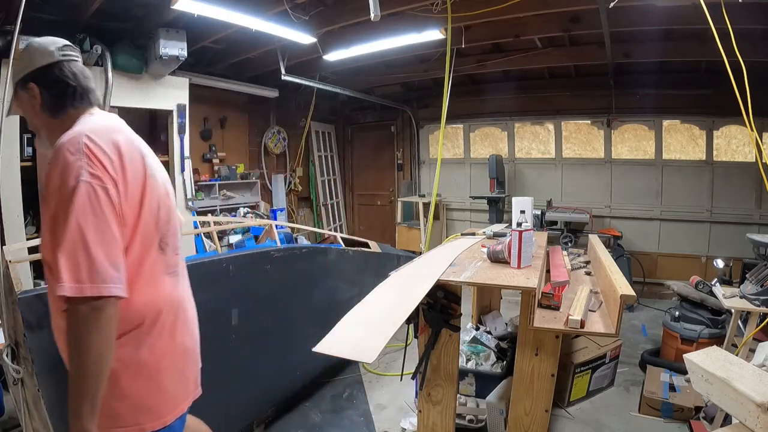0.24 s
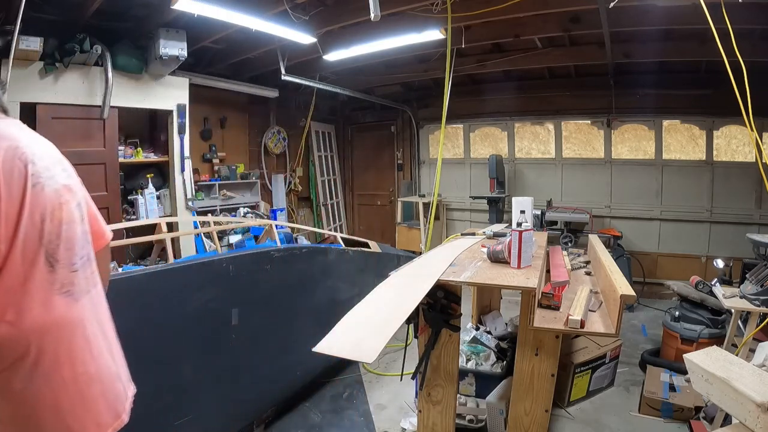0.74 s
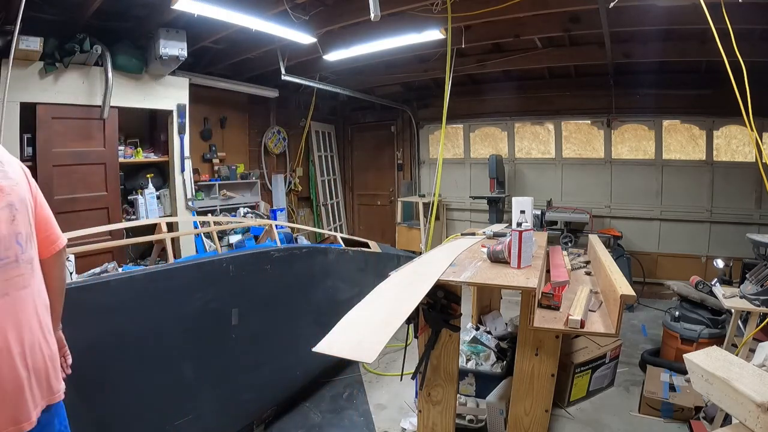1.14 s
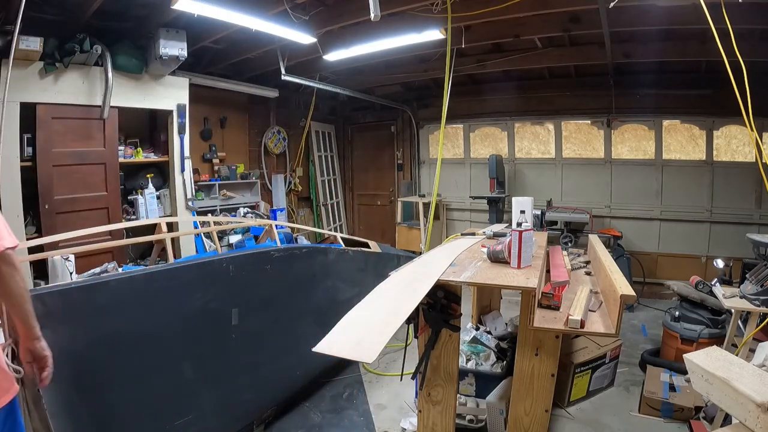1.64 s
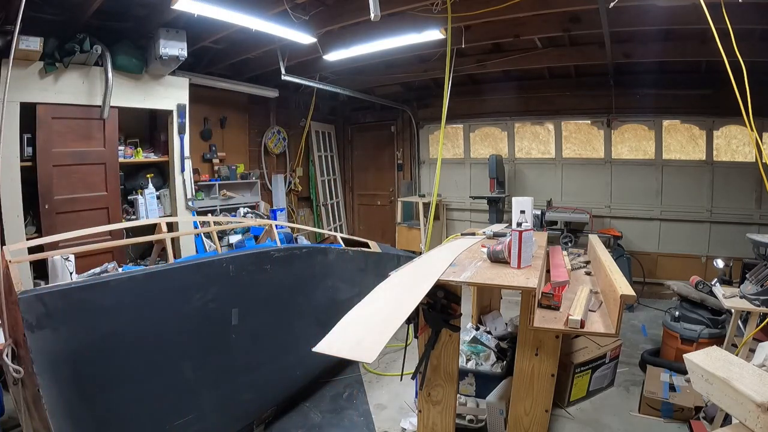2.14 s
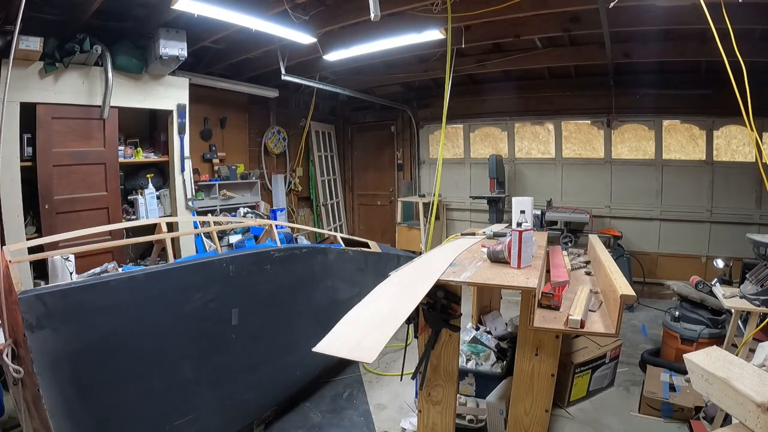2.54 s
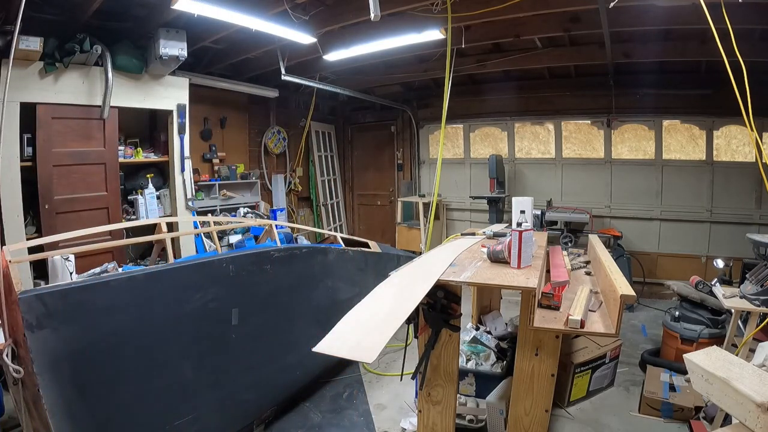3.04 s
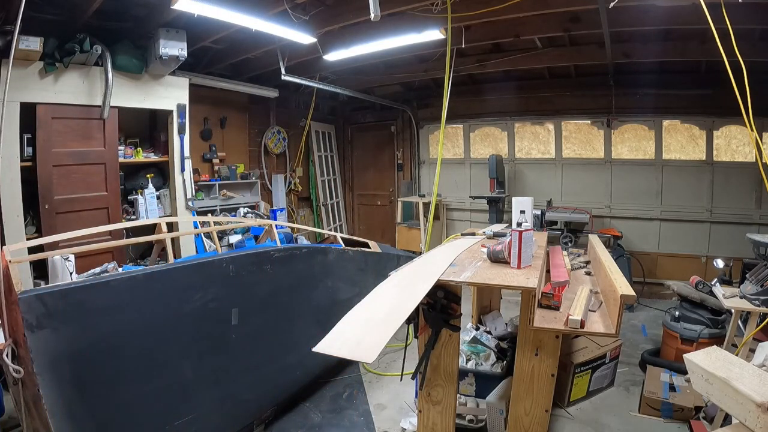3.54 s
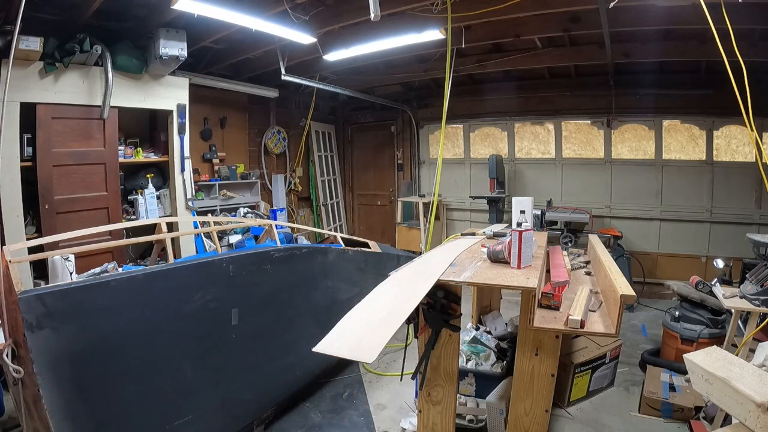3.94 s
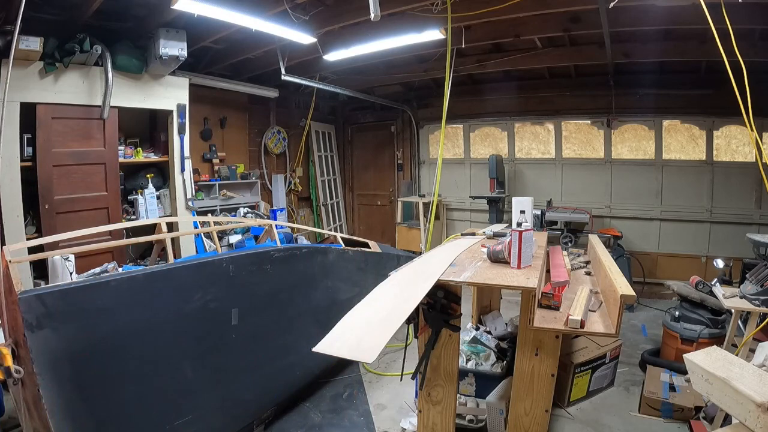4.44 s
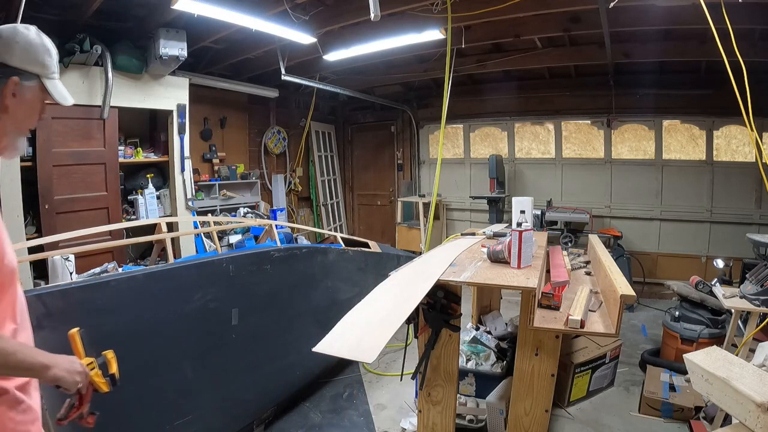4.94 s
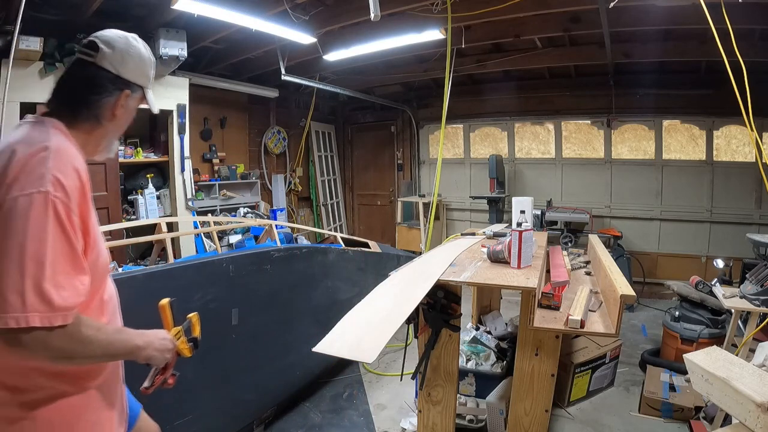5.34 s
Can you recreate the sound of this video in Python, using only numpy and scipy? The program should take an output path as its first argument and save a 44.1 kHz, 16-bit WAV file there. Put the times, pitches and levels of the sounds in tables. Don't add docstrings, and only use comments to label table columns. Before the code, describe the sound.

Soles scuff on a gritty garage floor, small parts tick, then a board scrapes loudly off a shelf over a low uneven hum.

```python
import sys
import numpy as np
from scipy import signal
from scipy.fft import rfft, irfft, next_fast_len
from scipy.io import wavfile
from scipy.ndimage import uniform_filter1d

SR = 44100
rng = np.random.default_rng(int(sys.argv[2]) if len(sys.argv) > 2 else 0)


def store_wav(level_fs):
    pcm = np.round(np.clip(np.atleast_2d(level_fs), -1, 1) * 32767)
    wavfile.write(sys.argv[1], SR, pcm.T.astype(np.int16))


def gain_from_db(level_db):
    decades = np.asarray(level_db, float) / 20
    return 10 ** decades


N = 246556
T = np.arange(N) / SR
TICK_T = np.arange(SR // 8) / SR
PORTS = np.array([[1], [-1]])


def unit(x):
    return x / np.sqrt(np.mean(x ** 2))


def over_log_hz(hz, table):
    points_hz, values = np.array(table)[:, :2].T
    return np.interp(np.log(hz), np.log(points_hz), values)


def over_hz(table, size):
    return over_log_hz(np.maximum(np.arange(size // 2 + 1) * SR / size, 1), table)


def colour(x, table):
    size = next_fast_len(x.shape[-1], real=True)
    return irfft(rfft(x, size) * gain_from_db(over_hz(table, size)), size)[..., :x.shape[-1]]


def band(x, lo_hz, hi_hz):
    edges_hz = [lo_hz, min(hi_hz, .45 * SR)]
    return signal.sosfilt(signal.butter(3, edges_hz, "band", fs=SR, output="sos"), x)


def resonate(x, modes):
    out = 0
    for k, (hz, width_hz, db) in enumerate(modes):
        out = out + (-1) ** k * gain_from_db(db) * signal.lfilter(*signal.iirpeak(hz, hz / width_hz, SR), x)
    return out


def narrow(x, hz, width_hz):
    mode = [(hz, width_hz, 0)]
    return resonate(resonate(x, mode), mode)


def ring(hz, db, t60_s):
    decay = gain_from_db(db - 60 * TICK_T / max(t60_s, .003))
    return decay * np.sin(2 * np.pi * hz * TICK_T) * np.clip(TICK_T / 0.00063, 0, 1) ** 2


def grit(rate, scatter_db):
    hit, sign, size = rng.random((3, N))
    size_db = scatter_db * np.minimum(-np.log(1 - size), 3.5)
    return unit((hit < rate / SR) * np.sign(sign - .5) * gain_from_db(size_db))


def walk(rate):
    k = int(SR / rate)
    held = rng.standard_normal(N)[np.arange(N) // k]
    return 1.293 * uniform_filter1d(uniform_filter1d(held, k), k)


def strokes(rows):
    main, second = 1e-12, 1e-12
    for s, rise_s, db, second_db, t60_s in rows:
        age = T - s
        rise = np.clip(age / max(rise_s, .001), 0, 1) ** 0.35
        fade = gain_from_db(db - 60 * np.maximum(age - rise_s, 0) / max(t60_s, .02))
        power = (fade * rise) ** 2
        main = main + power
        treble_fade_db = 36 * np.clip(age - rise_s, 0, .3)
        second = second + power * gain_from_db(second_db - treble_fade_db) ** 2
    return np.sqrt(main), np.sqrt(second)


def pan(x, db):
    return x * gain_from_db(np.array([db + 0 * T, -db + 0 * T]) / 2)


def spread(a, b):
    # f/Hz, likeness [0-1]
    likeness = [(62, 0.95), (260, 0.76), (1050, 0.24), (4100, 0.69), (12500, 0.25)]
    size = next_fast_len(len(a), real=True)
    like = np.clip(over_hz(likeness, size), 0, 1)
    mid = rfft(a, size) * np.sqrt((1 + like) / 2)
    side = rfft(b, size) * np.sqrt((1 - like) / 2)
    return irfft(np.array([mid + side, mid - side]), size)[:, :len(a)]


def scuffs():
    # start t/s, rise/s, peak level/dB, dust level/dB
    # relative to it, fade t60/s
    slides = [(0.0, 0.05, -58, 3, 0.41), (.105, 0.056, -53.5, -3, 0.76), (.278, 0.041, -50, -3, 0.62),
              (.425, 0.019, -54.5, -2, 0.66), (.56, 0.075, -70.5, 6.5, 0.27), (.792, 0.03, -42, 0.5, 0.2),
              (.83, 0.0072, -45.5, -1, 0.48), (.92, 0.013, -55, -1.5, 1.2), (1.04, 0.017, -57, 2.5, 0.97),
              (1.135, 0.049, -53, -2.5, 0.2), (1.182, 0.003, -35, -4, 0.03),
              (1.195, 0.0079, -51, -15, 0.59), (1.425, 0.024, -60.5, -2, 3.8),
              (1.54, 0.023, -43.5, 0, 0.38), (1.772, 0.027, -52.5, -11, 2.1),
              (1.855, 0.0083, -49.5, -4.5, 0.59), (1.89, 0.11, -48.5, -0.5, 0.61),
              (2.02, 0.053, -45.5, 1.5, 0.21), (2.204, .008, -54, 11.5, .25), (2.215, 0.034, -44, 7, 0.21),
              (2.243, 0.045, -33.5, -5.5, 0.32), (2.38, 0.0085, -66, -12, 0.3),
              (2.655, 0.0086, -65, -15.5, 1.17), (.73, 0.077, -66, 5, 0.094),
              (2.81, 0.0043, -48, -14, 0.73), (2.89, 0.012, -42.5, -27, 0.26),
                (3.215, .004, -29, -11.5, 0.29), (3.437, 0.0049, -46.5, -5, 0.76),
                (3.473, 0.0069, -41, -6.5, 0.6), (3.569, 0.043, -44.5, -4.5, 0.16),
                (3.897, 0.008, -62, -15, 1.27), (3.99, 0.056, -66.5, 3.5, 0.98),
                (4.11, 0.05, -55, -1.5, 3.6), (4.17, 0.095, -50.5, 2, 0.21), (4.245, 0.03, -42, -3.5, 0.32),
                (4.365, 0.03, -44.5, -29, 0.4), (4.441, 0.0035, -49, 1.5, 0.16),
                (4.56, 0.19, -59.5, 2, 0.23), (4.74, 0.024, -46.5, 1.5, 0.48),
                (4.85, 0.033, -46.5, -6, 0.73), (5.05, 0.0083, -54, 1, 0.67), (5.11, .02, -60, -11.5, 0.6),
                (5.266, 0.0064, -63, 3.5, 1.4), (5.38, 0.19, -60.5, -3.5, 0.32),
                (5.562, .005, -49, -7, 0.44)]
    # f/Hz, level/dB per Hz
    sole_colour = [(310, -30.5), (620, -22.5), (880, -15), (1150, -3), (1900, -2), (2900, -4), (4400, -8.5),
                   (7100, -19), (10500, -53.5)]
    # f/Hz, level/dB per Hz
    dust_colour = [(1500, -26), (3000, -6), (4500, -1), (6000, -3.5), (7800, -6.5), (9000, -11.5),
                   (12500, -20), (15500, -39)]
    # t/s, left minus right level/dB
    walker = [
        (0.0, 2.5),
        (2.3, 5.5),
        (2.95, 4.5),
        (3.301, 4),
        (4.5, 5),
        (5.59, 5),
    ]
    grit_gain, dust_gain = strokes(slides)
    s, side_db = np.transpose(walker)
    raw = grit(9000, scatter_db=1.5)
    coarse = unit(colour(raw, sole_colour))
    fine = unit(colour(grit(14000, scatter_db=3.0), dust_colour))
    flutter = gain_from_db(-4.0 + 1.5 * walk(60))
    rub = flutter * (grit_gain * coarse + dust_gain * fine) + hollows(raw[::-1])
    return pan(rub, 1.04 * np.interp(T, s, side_db))


def hollows(raw):
    rubs = [(0.132, .08, 1480, 430, -57), (.31, 0.07, 1300, 230, -59), (.31, 0.067, 1820, 300, -59.5),
            (0.455, 0.035, 1740, 450, -60), (0.797, 0.089, 2140, 520, -49), (0.8, 0.062, 1474, 180, -50.5),
            (1.184, 0.089, 1160, 140, -52), (1.186, .04, 2100, 250, -53), (1.228, .035, 2150, 150, -54),
            (1.187, .06, 1500, 120, -55), (1.797, 0.16, 1810, 600, -56.5), (1.94, 0.2, 1700, 82, -58),
            (1.9, 0.061, 3660, 810, -56), (1.95, 0.061, 2850, 400, -52.5), (2.3, 0.054, 1390, 230, -44.5),
            (2.24, .07, 2580, 370, -46), (2.655, 0.17, 2600, 400, -72), (2.812, 0.1, 2960, 300, -57.5),
            (2.806, .04, 5600, 300, -62.5), (2.887, .05, 3163, 250, -50.5),
            (3.474, 0.094, 1190, 420, -52.5), (3.597, 0.061, 1130, 340, -52),
            (3.905, 0.084, 1300, 500, -70), (3.896, 0.37, 3000, 830, -67.5), (4.249, 0.076, 1170, 200, -60),
            (4.39, 0.06, 2820, 500, -50), (4.748, 0.067, 1790, 250, -56.5), (4.743, 0.066, 2690, 330, -55),
            (4.878, 0.056, 2390, 400, -56.5), (4.914, 0.063, 1720, 400, -58), (4.5, 0.033, 2630, 430, -58),
            (4.443, 0.065, 5720, 560, -51.5), (4.372, .08, 1900, 600, -54), (2.66, .1, 1200, 500, -67),
            (5.565, 0.015, 1400, 500, -55.5), (5.125, .03, 1430, 440, -60), (.585, .07, 1200, 400, -64),
            (.505, .045, 1700, 600, -63), (4.29, .03, 1800, 500, -56), (1.2, .03, 1300, 500, -52)]
    out = np.zeros(N + SR)
    for s, length_s, hz, width_hz, db in rubs:
        i = int(s * SR)
        u = np.arange(int(length_s * SR)) / (length_s * SR)
        sung = unit(narrow(np.resize(raw[i:], len(u)), hz, width_hz))
        out[i:i + len(u)] += gain_from_db(db) * sung * np.sin(np.pi * u ** 0.36)
    return out[:N]


def board():
    # t/s, level/dB
    drag = [
        (3.006, -80),
        (3.009, -31),
        (3.024, -23),
        (3.055, -19),
        (3.075, -19),
        (3.13, -22),
        (3.165, -29.5),
        (3.205, -38),
        (3.3, -50.5),
    ]
    # t/s, extra pressure/dB
    jumps = [(3.022, 4), (3.029, 3), (3.038, 2), (3.047, 4), (3.0565, 2.5), (3.065, 3.5), (3.076, 2.5),
             (3.089, 4), (3.099, 5), (3.109, 3.5), (3.117, 3), (3.123, 2.5), (3.136, 3.5), (3.148, 2),
             (3.165, 2.5), (3.178, 3), (3.188, 3)]
    # f/Hz, width/Hz, level/dB
    flat_modes = [(993, 35, -3), (1310, 30, -0.5), (1704, 46, 1), (1960, 42, -1.5), (2160, 18, -2),
                  (2360, 46, 1.5), (2500, 16, 4), (2880, 42, -6.5), (3510, 21, -11), (3900, 65, -9),
                  (4430, 78, -14.5)]
    edge_modes = [(1042, 43, 0), (1402, 52, 1.5), (1840, 63, -2.5), (1910, 13, 1.5), (2220, 74, -6),
                  (2500, 29, -7), (2788, 27, -9.5), (2910, 48, -16.5), (3360, 50, -11.5), (3830, 39, -11.5),
                  (4080, 23, -13)]
    # f/Hz, level/dB per Hz
    skin_colour = [(90, -38), (160, -11.5), (310, -20.5), (780, -4), (1000, 1), (1400, -4.5), (2400, -3),
                   (4000, -8.5), (7300, -16.5), (9500, -29), (12400, -34.5), (15400, -58)]
    level_db = np.interp(T, *np.transpose(drag), right=-120) - 1.5
    for s, db in jumps:
        level_db = level_db + db * np.exp(-((T - s) / .003) ** 2)
    age = T - drag[0][0]
    tipped = (1 + np.tanh((T - 3.085) / 0.017)) / 2
    low_db = -4 + 8 * tipped

    jolts = band(grit(2200, scatter_db=2.5) * gain_from_db(1.2 * walk(90)), 230, 5000)
    jolts = np.array([jolts, jolts[::-1]])
    low = unit(resonate(jolts, edge_modes))
    high = unit(resonate(jolts, flat_modes))
    skin = colour(grit(8000, scatter_db=2.0), skin_colour)
    skin = np.array([skin, skin[::-1]])

    body = gain_from_db(1.78 * low_db - 6.5) * low + gain_from_db(-1.6 * low_db - 8.5) * high
    body = body + gain_from_db(.6 * low_db - 5.0) * unit(band(skin, 410, 1500))
    body = body + gain_from_db(-.4 * low_db - 2.0) * unit(band(skin, 1500, 3400))
    hiss = gain_from_db(-4 - 61 * np.clip(age, 0, .18)) * unit(band(skin, 3780, 9500))
    splinter_gain = gain_from_db(-26.5 - 29.5 * np.clip(age, 0, .2)) * np.clip(age / .02, 0, 1)
    splinters = splinter_gain * unit(band(skin[::-1], 8800, 14200))
    near, far = gain_from_db(level_db - 0.5) * (body + splinters + hiss)
    return pan(near, 3.9) + gain_from_db(-7.5) * band(far, 1300, 16000) * PORTS


def box():
    # start t/s, rise/s, rumble/dB, rattle/dB relative to the
    # rumble, fade t60/s
    shifts = [(1.181, 0.0038, -48.5, 3.5, 0.13), (1.225, 0.0043, -50, -14, 0.27),
              (.02, 0.073, -62, -20, 0.73), (2.24, 0.094, -67.5, 13, 0.16), (2.645, 0.033, -55.5, -19, 1),
              (2.778, 0.027, -40.5, -10, 1.3), (2.888, 0.041, -40, -1.5, 0.44),
              (3.008, 0.038, -29, -5, 0.28), (3.095, 0.033, -32, 4.5, 0.29), (3.2, 0.018, -41.5, -3, 0.27),
              (3.605, 0.0052, -70, 12.5, 0.22), (3.845, 0.0055, -58, -6.5, .1),
              (3.885, 0.082, -51, -12.5, 0.33), (4.09, 0.04, -54, -17, 1.4),
              (4.364, 0.026, -46, -5.5, 0.34), (4.385, 0.035, -40.5, -5, 0.33)]
    # f/Hz, width/Hz, level/dB
    box_modes = [(99, 19, 0), (162.3, 64.6, 0), (213, 73, 0.5), (298, 57, 1), (398, 71, -4)]
    rattle_modes = [(466, 52, 2.5), (578, 132, 3), (795, 74, -2.5), (987, 130, 0), (1660, 170, -10.5),
                    (3030, 330, -12.5)]
    rumble_gain, rattle_gain = strokes(shifts)
    rumble = band(resonate(grit(600, scatter_db=1.5), box_modes), 70, 470)
    rattle = band(resonate(grit(1800, scatter_db=0.0), rattle_modes), 370, 4000)
    return pan(gain_from_db(-0.5) * (rumble_gain * unit(rumble) + rattle_gain * unit(rattle)), 1.2)


def bumps():
    # t/s, peak level/dB, ring f/Hz
    knocks = [(2.661, -48, 288), (2.692, -49, 240), (2.751, -46, 304), (2.786, -44, 516), (2.796, -40, 400),
              (2.828, -40, 300), (2.857, -34, 325), (2.889, -35, 248), (2.893, -39.5, 600),
              (2.905, -34.5, 320), (2.931, -29.5, 150), (2.933, -34, 430), (2.954, -35, 297),
              (2.972, -36, 150), (3.919, -49, 275), (3.945, -50, 330), (4.153, -46, 230), (4.269, -50, 218),
              (4.372, -44, 209), (4.387, -40, 380), (4.406, -40, 600), (4.42, -37, 380), (4.437, -41, 349),
              (4.452, -41, 400), (4.47, -44, 450), (4.49, -45, 330), (4.416, -38, 190), (1.183, -42, 300),
              (1.228, -42, 280), (3.03, -28, 400), (3.1, -28, 400)]
    out = np.zeros(N + SR)
    push = np.clip(TICK_T / .003, 0, 1)
    for s, db, hz in knocks:
        i = int(s * SR)
        out[i:i + len(TICK_T)] += ring(hz, db, 15 / hz) * push
    return pan(out[:N], 1.2)


def ticks():
    # t/s, peak level/dB, ring f/Hz, ring level/dB relative
    part_ticks = [(0.0428, -33, 2200, -26), (1.1825, -34, 1200, -16), (1.2848, -40, 1450, -3),
                  (1.7752, -30, 1311, -16), (1.7969, -31.5, 1490, -9), (1.8652, -24, 1920, -14),
                  (2.7856, -42, 1210, -4), (2.8935, -32, 2400, -14.5), (3.4384, -22.5, 2100, -11.5),
                  (3.4771, -24.5, 1840, -7.5), (3.6652, -49.5, 3550, 15.5), (3.9, -44.5, 2850, -12),
                  (4.0975, -40, 4300, -4), (1.183, -33, 4200, -6), (4.2502, -26, 1670, -21),
                  (4.7405, -31, 1763, -16), (5.5662, -43.5, 3350, 6.5),
                  (0.965, -34, 4820, -8), (4.225, -46, 9000, -20), (3.2176, -34.5, 4740, -19),
                  (4.0785, -46, 8000, -20), (4.135, -44, 7000, -22), (4.4425, -45, 4000, -20),
                  (5.2665, -39, 4860, -15.5), (1.847, -42, 4500, -18), (5.159, -53, 5080, -4),
                  (.3127, -42, 1500, -15), (0.453, -46, 1667, -15), (.966, -41, 10000, -20),
                  (5.0615, -48, 2690, -15), (5.524, -52, 10000, -22), (3.021, -14, 2200, -9),
                  (4.4425, -48, 12500, -20), (3.907, -51, 1400, -12), (1.909, -42, 4200, -15),
                  (3.24, -31, 1340, -7.5), (4.4415, -37, 8000, -20)]
    # f/Hz, level/dB, t60/s
    clamp_modes = [(5220, -8, 0.072), (5450, -17, .05), (5640, -4, 0.051), (5760, 2, 0.02), (5800, -5, .13),
                   (6000, -9, .04), (7770, -3, 0.032)]
    touches = part_ticks
    out = np.zeros((2, N + SR))
    noises = rng.standard_normal((len(touches), len(TICK_T)))
    for (s, db, hz, ring_db), noise in zip(touches, noises):
        i = int(s * SR)
        crack = band(noise * np.exp(-TICK_T / 0.0013), 0.88 * hz, min(2.6 * hz, hz + 3500))
        crack = gain_from_db(-7.5) * crack / np.max(np.abs(crack))
        place = gain_from_db(db - 1.5 + 4.5 * PORTS / 2)
        out[:, i:i + len(TICK_T)] += place * (crack + ring(hz, ring_db, 30 / hz))
    clink = sum(ring(*mode) for mode in clamp_modes)
    for s, db in (4.4412, -43.5), (4.4437, -40.5):
        i = int(s * SR)
        out[:, i:i + len(TICK_T)] += gain_from_db(db) * clink
    return out[:, :N]


def swells(rows, hz, drift_hz, rest_db):
    gain = gain_from_db(rest_db)
    for s, db, half_s in rows:
        gain = gain + gain_from_db(db) * np.cos(np.pi / 2 * np.clip((T - s) / half_s, -1, 1)) ** 2
    phase = 2 * np.pi * np.cumsum(hz + drift_hz * walk(5.7)) / SR
    return np.sqrt(2) * gain * np.sin(phase)


def compressor():
    # peak t/s, level/dB, half length/s
    main_swells = [(.0, -36.5, 0.11), (.18, -35, 0.19), (.42, -38.5, 0.19), (.79, -40.5, 0.16),
                   (1.06, -40, 0.17), (1.33, -43, 0.13), (1.58, -46.5, 0.13), (1.83, -45.5, 0.19),
                   (2.09, -41, 0.18), (2.44, -45, 0.17), (2.73, -46, 0.08), (2.86, -52, 0.093),
                   (2.96, -44, 0.12), (3.17, -47, 0.062), (3.39, -43, 0.19), (3.62, -47, 0.22),
                   (3.85, -46, 0.26), (4.11, -40.5, 0.4), (4.372, -39, 0.02), (4.46, -39, 0.094),
                   (4.69, -37.5, 0.18), (5.0, -39, 0.22), (5.31, -39.5, 0.23), (5.59, -37.5, 0.23)]
    low_swells = [(.0, -38.5, 0.049), (.2, -48, 0.22), (.45, -49, 0.14), (.8, -49, 0.19),
                  (1.15, -50.5, 0.36), (1.4, -48.5, 0.16), (1.61, -50, 0.11), (1.9, -53, 0.18),
                  (2.2, -63, 0.35), (2.5, -48.5, 0.095), (2.95, -61, 0.33), (3.63, -54, 0.13),
                  (3.84, -46, 0.057), (4.1, -46.5, 0.19), (4.4, -48, 0.25), (4.8, -53, 0.21),
                  (5.15, -49, 0.38), (5.5, -48.5, 0.35)]
    top_swells = [(.0, -57, 0.34), (.45, -58.5, 0.36), (.9, -65, 0.72), (1.3, -70, 0.28), (3.4, -67, 0.19),
                  (4.65, -56, 0.83), (5.05, -63.5, 0.39), (5.5, -56.5, 0.45)]
    # t/s, f/Hz, level/dB
    mid_path = [(0.0, 73.8, -50), (0.83, 76.8, -59.5), (1.15, 70.2, -50), (1.6, 76.6, -58),
                (1.87, 79.8, -50), (2.66, 79.2, -68), (3.02, 72.98, -40), (3.1, 79.3, -57),
                (3.55, 79.4, -59), (4.14, 75.54, -42.5), (4.23, 75.6, -46), (4.37, 79.2, -37),
                (4.41, 77, -50), (4.58, 75.46, -50.5), (5.59, 78.3, -56)]
    # f/Hz, width/Hz, level/dB
    side_tones = [(33.4, 14, -60.5), (62.9, 14, -60.5), (100, 16, -65)]
    s, hz, db = np.transpose(mid_path)
    mid_phase = 2 * np.pi * np.cumsum(np.interp(T, s, hz)) / SR
    mid = np.sqrt(2) * gain_from_db(np.interp(T, s, db)) * np.sin(mid_phase)
    main = swells(main_swells, hz=129.4, drift_hz=0.704, rest_db=-61.5)
    low = swells(low_swells, hz=52.8, drift_hz=0.52, rest_db=-63.5)
    out = main + swells(top_swells, hz=158.2, drift_hz=.6, rest_db=-75)
    for hz, width_hz, db in side_tones:
        out = out + gain_from_db(db) * unit(narrow(rng.standard_normal(N), hz, width_hz))
    return out + low * (0.99 + 0.29 * walk(16)) + mid * (.6 + 0.78 * walk(17))


def air():
    # f/Hz, level/dB per Hz
    air_colour = [(15, 13), (30, 11.5), (100, 16), (200, 17), (300, 4.5), (600, -3), (870, -8.5), (1150, 2),
                  (2300, -14.5), (5000, -9.5), (7500, -9.5), (9000, -20), (12500, -23.5), (15500, -49)]
    # t/s, level/dB
    sway = [
        (0, -1),
        (1.5, 0),
        (2.5, -1),
        (2.75, -2),
        (3.3, -1.5),
        (3.8, -2),
        (4.1, 0),
        (4.6, -0.5),
        (5.59, 0),
    ]
    tone = colour(spread(*rng.standard_normal((2, N))), air_colour)
    level_db = -61.5 + np.interp(T, *np.transpose(sway)) + 1.0 * walk(3)
    return gain_from_db(level_db) * tone / np.std(band(tone, 200, 15000))


def shelves(x):
    scatter = band(rng.standard_normal(len(TICK_T)) * gain_from_db(-60 * TICK_T / 0.02), 900, 16000)
    scatter = scatter + gain_from_db(0.5) * band(scatter, 6800, 16000)
    side = signal.fftconvolve(x, scatter / np.sqrt(np.sum(scatter ** 2)))[:N]
    return gain_from_db(-8) * side * PORTS


def room(x):
    # f/Hz, t60/s
    decay_times = [(130, 0.25), (520, 0.39), (2100, 0.38), (6200, 0.33), (12500, 0.14)]
    t, tail = np.arange(SR) / SR, 0
    onset = 1 - np.exp(-(t / 0.0067) ** 2)
    for hz in 63 * 2. ** np.arange(8):
        t60_s = over_log_hz(hz, decay_times)
        octave = band(rng.standard_normal((2, SR)), hz, 2 * hz) * gain_from_db(-60 * t / t60_s) * onset
        tail = tail + octave / np.sqrt(t60_s)
    tail = spread(*tail)
    tail = tail / np.sqrt(np.mean(np.sum(tail ** 2, axis=1)))
    return gain_from_db(-9.5) * signal.fftconvolve(x[None], tail, axes=1)[:, :N]


def scene():
    plank = board()
    others = scuffs() + box() + bumps() + ticks()
    near = others + plank
    scattered = (others + gain_from_db(-5) * plank).mean(axis=0)
    return near + shelves(scattered) + room(near.mean(axis=0)) + compressor() + air()


def roll_off(x):
    return signal.sosfilt(signal.butter(12, 15690, fs=SR, output="sos"), x)


def record(dry):
    rounded = np.tanh(.6 * dry) / .6
    low_pass = signal.ellip(8, .2, 60, 15500, fs=SR, output="sos")
    mix = signal.sosfilt(low_pass, rounded)
    return roll_off(mix)


dry = scene()
out = record(dry)
store_wav(out)
```